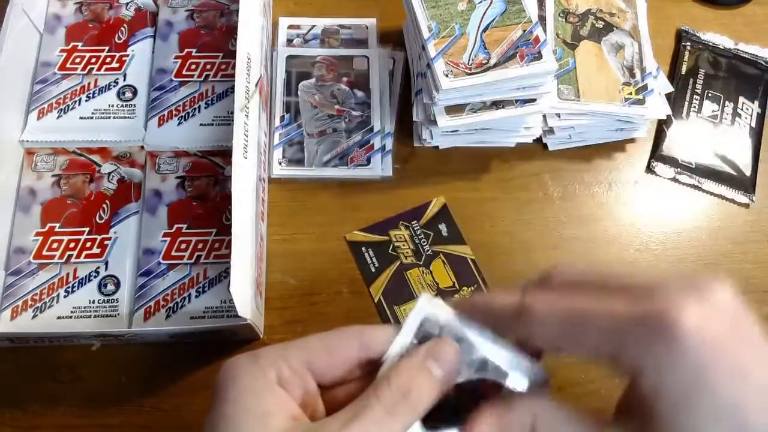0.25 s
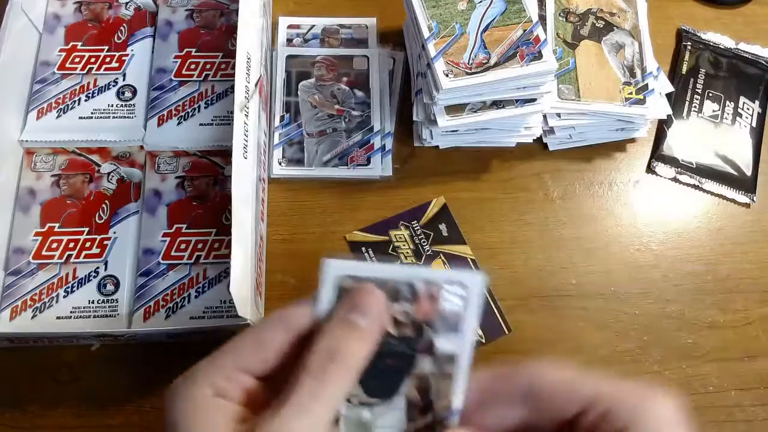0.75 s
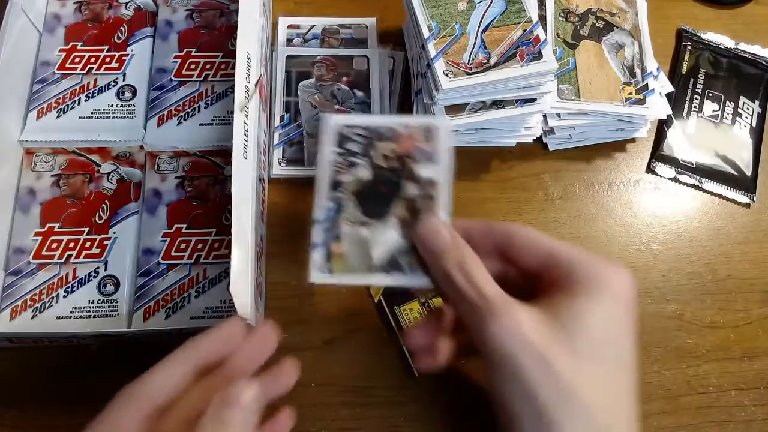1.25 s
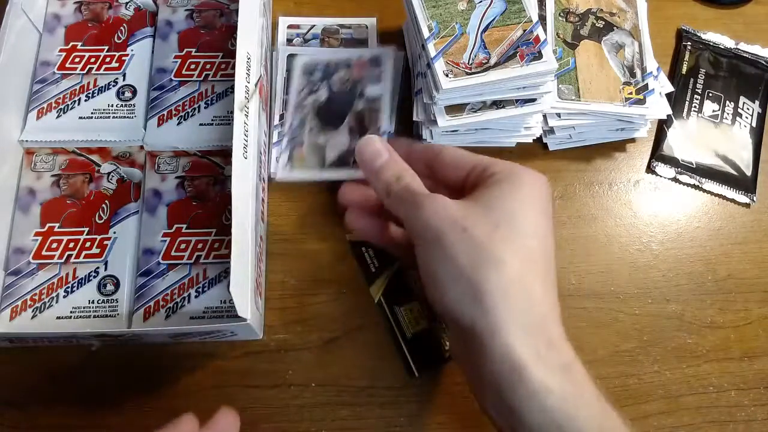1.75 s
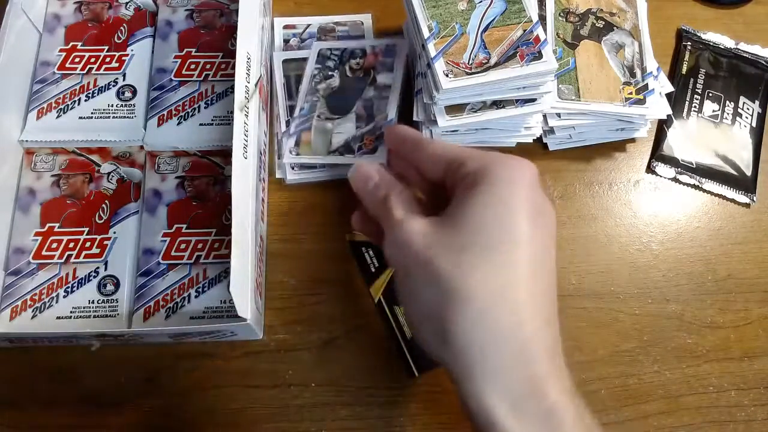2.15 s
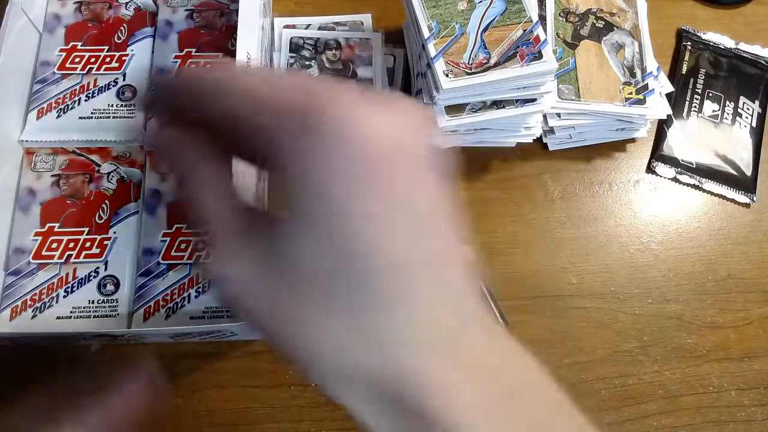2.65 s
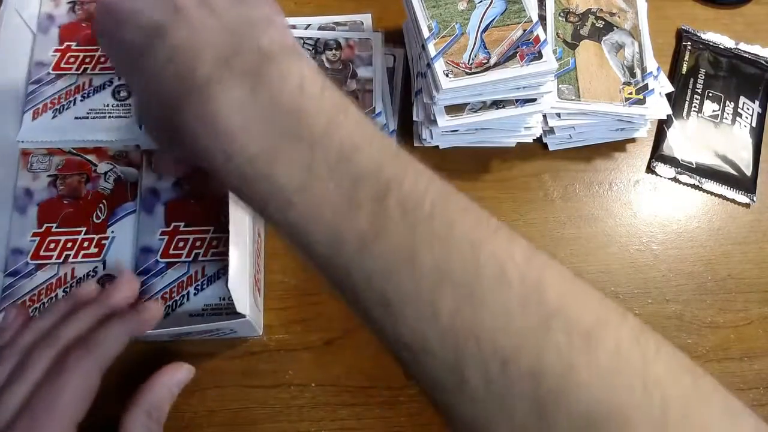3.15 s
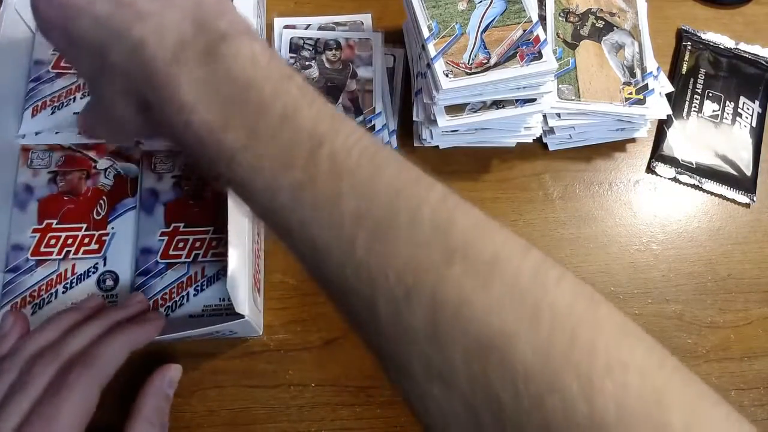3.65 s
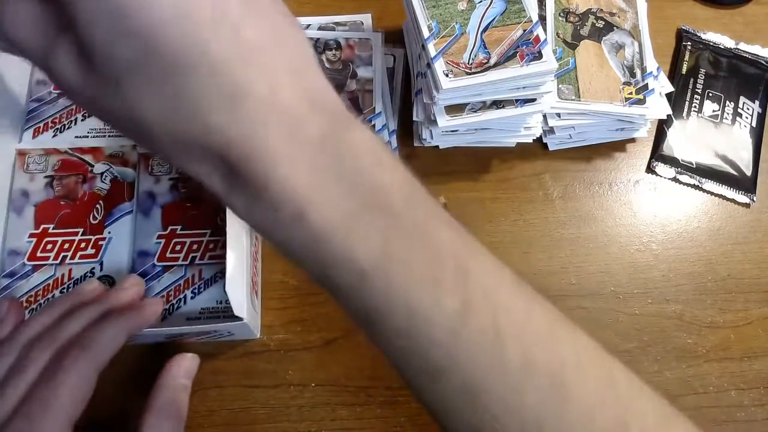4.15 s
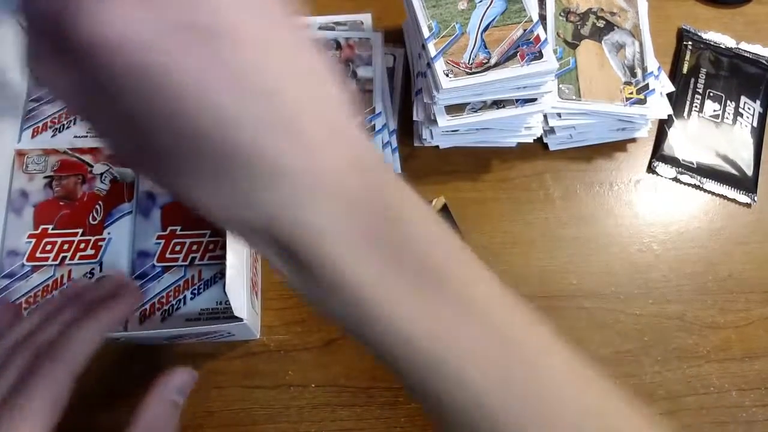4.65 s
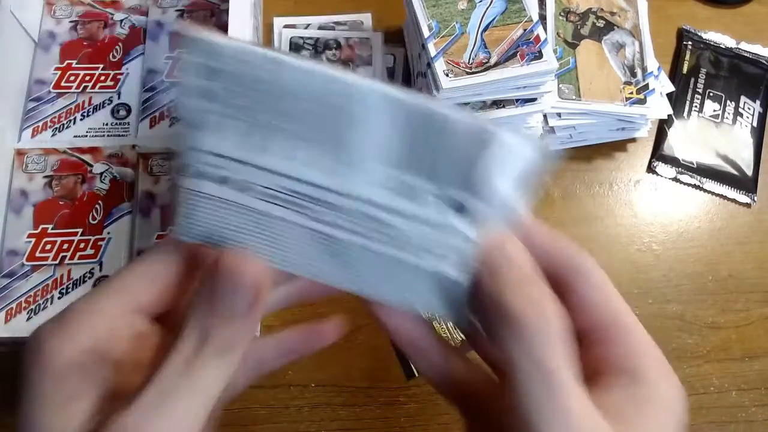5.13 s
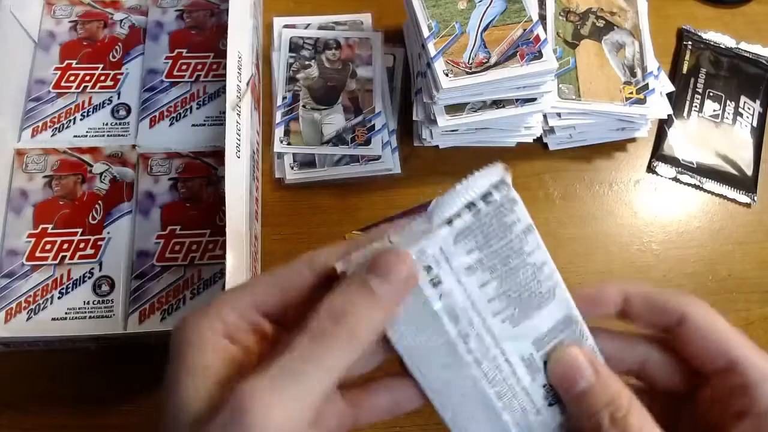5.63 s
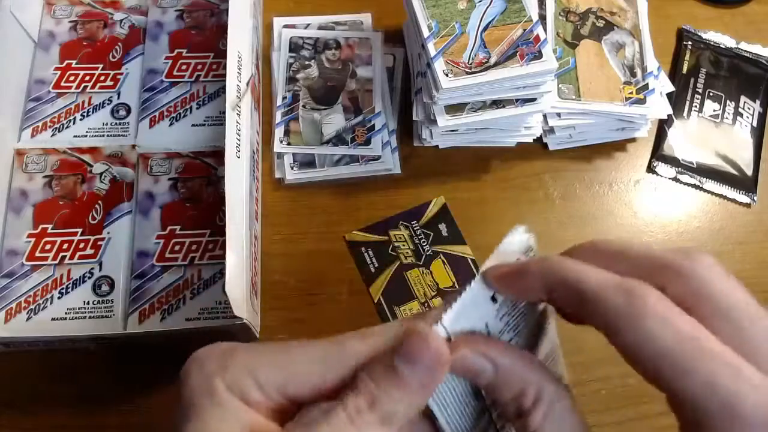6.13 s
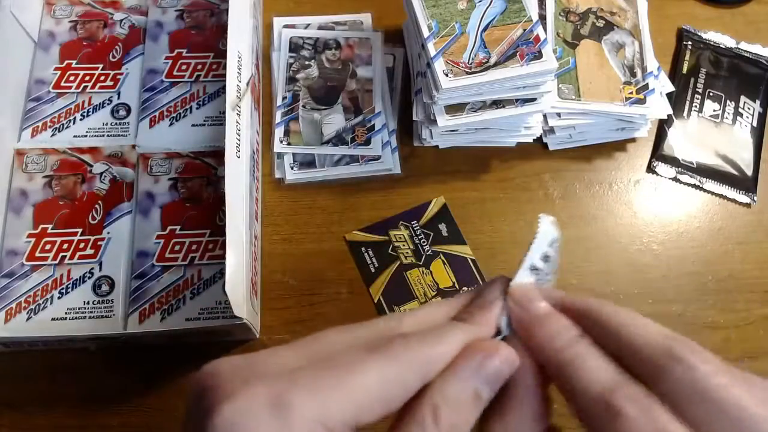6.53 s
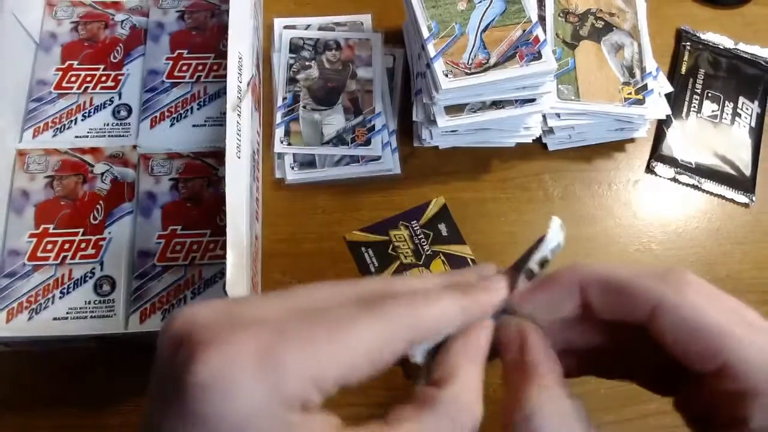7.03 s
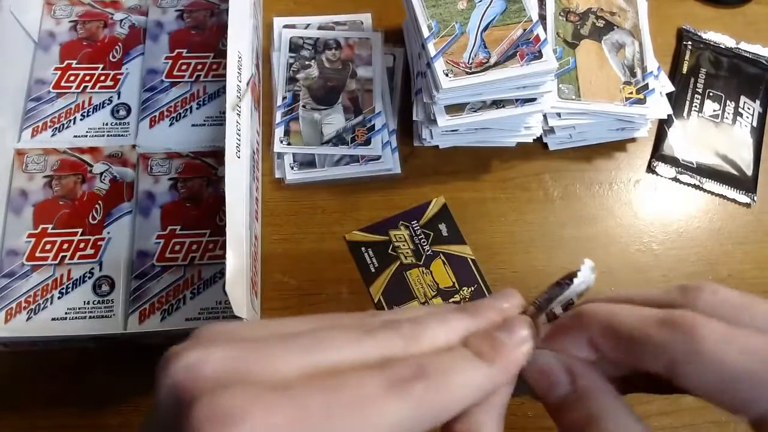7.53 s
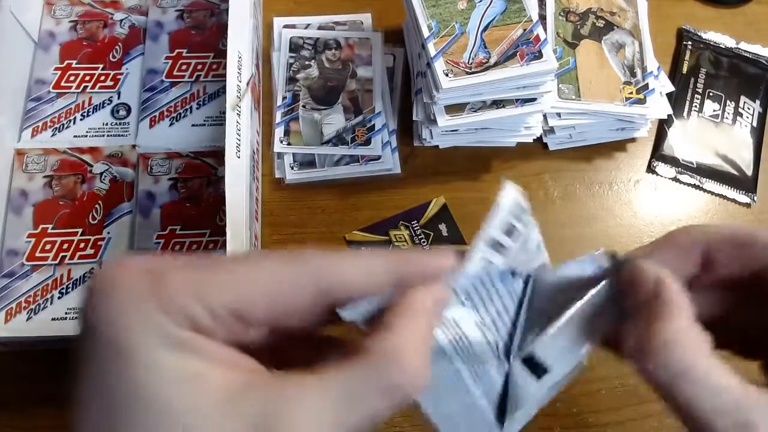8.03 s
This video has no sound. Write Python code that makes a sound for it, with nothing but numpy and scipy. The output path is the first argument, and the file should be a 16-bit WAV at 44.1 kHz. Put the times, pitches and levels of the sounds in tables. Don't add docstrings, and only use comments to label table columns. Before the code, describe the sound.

Close-up hands set down a card, rummage in a box, then turn, rip and peel a crinkly foil packet over faint fan noise.

```python
import sys
import numpy as np
from scipy import signal
from scipy.fft import rfft, irfft
from scipy.io import wavfile
from scipy.ndimage import uniform_filter1d

SR = 44100
rng = np.random.default_rng(int(sys.argv[2]) if len(sys.argv) > 2 else 0)


def amplitude_ratio(level_db):
    exponent = np.asarray(level_db, float) / 20
    return 10 ** exponent


def store_pcm(level_fs):
    pcm = np.round(np.clip(level_fs, -1, 1) * 32767).astype(np.int16)
    wavfile.write(sys.argv[1], SR, np.atleast_2d(pcm).T)


N = 365148


def evened(x):
    return x / np.sqrt(np.mean(x ** 2) + 1e-30)


def read(points, hz):
    f, value = np.transpose(points)
    return np.interp(np.log(hz + 1), np.log(f + 1), value)


def add(mix, s, sound):
    part = mix[round(s * SR):][:len(sound)]
    part += sound[:len(part)]


def coloured(x, gain):
    return irfft(rfft(x) * gain(np.fft.rfftfreq(len(x), 1 / SR)), len(x))


def band(x, lo_hz, hi_hz):
    sections = signal.butter(3, [lo_hz, hi_hz], "bandpass", fs=SR, output="sos")
    return signal.sosfilt(sections, x)


# [f/Hz, level/dB per Hz]
FOIL_RESPONSE = [(120, -5.5), (500, -15.5), (1300, 1), (2500, -8), (3300, -4), (4300, 3), (5900, -7),
                 (7400, -2), (9000, -8.5), (11500, -8.5), (14500, -8), (16800, -26.5)]


def foil(hz):
    return amplitude_ratio(read(FOIL_RESPONSE, hz))


def crackle(size, per_s, spread_db, smooth):
    happens = rng.random(size) < per_s / SR
    sizes_db = spread_db * np.minimum(rng.exponential(1, size), 3)
    slips = happens * amplitude_ratio(sizes_db) * rng.standard_normal(size)
    return evened(slips) + smooth * rng.standard_normal(size)


# [lowest f/Hz, highest f/Hz]
FOIL_BANDS = [(400, 2500), (2500, 6500), (6500, 10500), (10500, 16900)]
# [t/s, energy level/dB, low flex above it/dB, brightness/dB]
SLEEVE_SNAPS = [
    (.0298, -51.5, -4, 8),
    (.0867, -51, 15, -17),
    (.2978, -36, -4, -4),
    (.3257, -39, -19, 1.5),
    (.4443, -32, -3.5, -4),
    (.6118, -50, -5, -5),
    (.9103, -34, -6, 9.5),
    (2.0012, -45, 6, -8),
    (2.0501, -47, 0, -8),
]
BOX_SNAPS = [(3.0346, -36, 13, -17), (3.0465, -24.5, 1, -7), (3.0525, -27.5, 8.5, 3),
             (3.2071, -28.5, -0.5, -8), (3.423, -31, 7.5, -7), (3.452, -11.5, -4.5, -24),
             (3.491, -26, 4.5, -7), (3.5202, -19.5, -4.5, -10), (3.6306, -28.5, 0, -2),
             (3.653, -41, 11, -1), (3.679, -24, -5, -4.5), (3.797, -38.5, 12.5, 1), (3.82, -18.5, 0, -5.5),
             (3.836, -29, 10, -6), (3.856, -24.5, 1, -9), (3.873, -22.5, 2, -2), (3.903, -14.5, 7.5, 1.5),
             (3.9295, -14.5, -2, -7), (3.9596, -12, -5, -4), (4.062, -39.5, 14, -14),
             (4.1831, -27.5, -18, 4.5), (4.3236, -3.5, -13.5, -10.5), (4.4435, -29.5, -9, 2),
             (4.528, -30.5, 4, -3.5), (4.65, -45, 14, -7), (4.672, -33.5, 4.5, -18), (4.7018, -30, 8, -11),
             (4.7737, -17, -32, -3), (4.788, -30, -13, 0)]
TURN_SNAPS = [(4.9766, -33.5, -25, -3.5), (5.0508, -32, -21, -6.5), (5.1165, -25, -5, -11),
              (5.2015, -14.5, -16, -6), (5.2235, -14.5, -14, -11), (5.254, -4, -16, -14),
              (5.2587, -9, -26, -7), (5.2847, -9.5, -11.5, -5), (5.2946, -23, 1, -13),
              (5.3509, -15, -13, -7), (5.38, -28, -27, -4), (5.4094, -26, -9.5, -1.5), (5.46, -30, 1, -10),
              (5.4843, -16.5, -14, -7), (5.5992, -28, 1.5, -7), (5.6298, -26, -11, -2.5),
              (5.6332, -25.5, -3, -2), (5.682, -26, 3, -6), (5.8104, -25, -3, -1),
              (5.8308, -19, -11.5, -1.5), (5.8367, -21, -24, -9), (5.8692, -18.5, -13, 4.5),
              (5.886, -18.5, -10, 0), (6.037, -25.5, -0.5, -9), (6.11, -22, -11, 8.5),
              (6.1305, -8.5, -13, -8), (6.1511, -22.5, -9, 10), (6.2143, -18, -3.5, -3),
              (6.2502, -17, -32, -6), (6.269, -20.5, -5.5, -4)]
TEAR_SNAPS = [(6.4211, -26.5, -3.5, 10.5), (6.471, -28.5, -11, 6.5), (6.5339, -26, -1, -6),
              (6.5547, -11.5, -11, 1.5), (6.5723, -20, -20, -9), (6.5762, -29, 7.5, 13),
              (6.5795, -18, -6, -4), (6.6058, -15.5, -6.5, -5), (6.627, -28, -17, 6), (6.6379, -35, -20, 9),
              (6.6527, -19.5, 1.5, 13), (6.6848, -25, 6.5, 10), (6.7183, -12.5, -10, 5.5),
              (6.7249, -17.5, -11, 1), (6.8017, -16, -13, 2), (6.8302, -19.5, -9, -3),
              (6.8634, -23, -4, -12), (6.8695, -17.5, -23, -13), (6.913, -23.5, -15, 2),
              (6.9663, -14, -9.5, -10), (6.9794, -28, 1.5, -2), (7.02, -29, 2, -4), (7.068, -11, -8.5, -2),
              (7.0855, -18.5, -1.5, -20), (7.1326, -26.5, -6, 3), (7.1467, -18.5, -15, -2),
              (7.2083, -22.5, -5, -1.5), (7.2504, -13.5, -6, -8.5), (7.282, -18.5, -13, -5),
              (7.3315, -24.5, -1.5, -7)]
PEEL_SNAPS = [(7.3945, -7.5, -12, -8), (7.5068, -19, -4.5, -11), (7.5497, -35, -1, -2),
              (7.5874, -18.5, -2.5, 3.5), (7.6036, -12.5, -2.5, -7), (7.6215, -20, -5, 1),
              (7.6575, -22.5, -8, -3.5), (7.7033, -26, -23, 0.5), (7.7768, -28, -14, -3),
              (7.7962, -36.5, -13, 13), (7.8582, -49, -13, 19), (7.8787, -24.5, -15, -12),
              (7.9292, -31, -10, 12), (7.9375, -21.5, -3, -2), (7.9415, -14.5, -14, -1),
              (7.946, -4, -20, -4.5), (7.9548, -16, -2.5, 4), (7.9647, -9, -4, -12), (8.004, -23, 0, -3),
              (8.0694, -13, -4.5, -7.5), (8.185, -28.5, -5, -14), (8.1921, -28, 1.5, -8),
              (8.2765, -25.5, -6.5, -5.5)]
# [t/s, energy level/dB]
FAINT_TICKS = [(3.568, -30), (3.574, -30.5), (3.588, -34), (3.6008, -32), (4.148, -32), (4.4535, -30.5),
               (4.4935, -30), (4.69, -38), (4.7556, -35.5), (5.3928, -28), (5.468, -40), (5.549, -29),
               (6.0673, -29.5), (6.2908, -26.5), (6.5987, -25), (6.851, -35), (7.0047, -32), (7.0886, -27),
               (7.1742, -29), (7.183, -30), (7.272, -25), (7.634, -30), (7.6533, -29), (8.0365, -35),
               (.342, -49), (.437, -47), (.929, -46), (.997, -49), (3.272, -49), (3.305, -52), (3.387, -46),
               (3.535, -32), (3.719, -42), (3.734, -37), (4.224, -39), (4.5057, -35), (5.0375, -42),
               (5.089, -46), (5.184, -35), (5.5183, -34), (5.5597, -34), (5.7907, -41), (6.563, -30),
               (6.614, -32), (6.818, -28), (6.902, -34), (7.0565, -42), (7.192, -32), (7.215, -31),
               (7.727, -35), (7.818, -38), (7.915, -35), (7.973, -21), (8.051, -36), (8.078, -28),
               (8.256, -40)]
TICK_FLEX_DB, TICK_BRIGHT_DB = -5, -3.5
FIZZ_DB, FIZZ_SLOPE, SHEEN_DB, SHEEN_SLOPE = 1.5, 0.79, -3, 1.11
FACET_DB = 2


def snaps():
    ticks = [(s, db, TICK_FLEX_DB, TICK_BRIGHT_DB) for s, db in FAINT_TICKS]
    rows = SLEEVE_SNAPS + BOX_SNAPS + TURN_SNAPS + TEAR_SNAPS + PEEL_SNAPS + ticks
    out, t = np.zeros(N), np.arange(512) / SR
    starts, db, low_db, bright_db = np.transpose(rows)
    noise = rng.standard_normal((len(rows), 513))
    slow = np.exp(0.2 * noise[:, -1:] - 0.018 * (db[:, None] + 12))
    flip = 1.7 * (np.arange(512) == 20)
    peaks = amplitude_ratio(FACET_DB * evened(uniform_filter1d(noise[:, 256:], 9)))
    facet = peaks * foil(np.fft.rfftfreq(512, 1 / SR))
    fizz_db = FIZZ_DB + FIZZ_SLOPE * bright_db
    sheen_db = SHEEN_DB + SHEEN_SLOPE * bright_db
    gains_db = [low_db + 0.24, -.7, fizz_db, sheen_db]
    fades_s = (0.0025, 0.0008, 0.00075, 0.0008)
    sounds = np.zeros((len(rows), len(t)))
    for fade, edge, gain_db in zip(fades_s, FOIL_BANDS, gains_db):
        crumple = noise[:, :512] * t / (t + 0.0002) * np.exp(-t / fade / slow)
        burst = rfft(flip + crumple)
        flattened = burst / (abs(burst) + .3) ** .3
        part = band(irfft(facet * flattened), *edge)
        sounds += amplitude_ratio(db + gain_db)[:, None] * part / np.linalg.norm(part, axis=1, keepdims=True)
    for s, sound in zip(starts, sounds):
        add(out, s, sound)
    return out


# [t/s, peak level/dB, f/Hz]
FACET_PINGS = [(3.4516, -25, 4260), (3.5194, -25, 3760), (3.6785, -36, 7360), (4.1829, -28, 7550),
               (4.3231, -13, 4700), (4.7735, -22, 4330), (5.0504, -39, 4300), (5.2011, -23, 4310),
               (5.254, -14, 4280), (5.2574, -20, 4300), (5.2839, -17, 5710), (5.3502, -25, 5130),
               (5.3807, -27, 5040), (5.4086, -32, 6660), (5.4675, -30, 5060), (5.4839, -28, 4400),
               (5.6321, -32, 6700), (5.8102, -32, 6610), (5.8306, -21, 6600), (5.8364, -20, 6030),
               (5.8686, -13, 14000), (6.11, -21, 9600), (6.13, -16, 4770), (6.1509, -16, 12500),
               (6.2143, -25, 3240), (6.2497, -23, 7200), (6.4213, -22, 7200), (6.554, -16, 7660),
               (6.5755, -24, 5000), (6.6059, -22, 3760), (6.6523, -14, 7570), (6.7171, -10, 9840),
               (6.8014, -27, 5860), (6.8299, -26, 5430), (6.8693, -28, 4000), (6.9127, -21, 12700),
               (6.9661, -28, 4100), (7.0673, -13, 7010), (7.1322, -28, 11700), (7.1462, -29, 7030),
               (7.208, -29, 7110), (7.2499, -20, 5400), (7.2818, -28, 5680), (7.3941, -11, 4020),
               (7.5058, -22, 5450), (7.5872, -22, 4080), (7.6201, -24, 4030), (7.6565, -29, 8080),
               (7.7029, -27, 6990), (7.7962, -32, 12600), (7.8785, -34, 4620), (7.9144, -33, 11500),
               (7.9404, -17, 4380), (7.9453, -13, 4340), (8.0691, -24, 3900)]
PING_DB, PING_CYCLES, PING_LATE_S = -5.5, 14, .0008


def pings():
    out, t = np.zeros(N), np.arange(1024) / SR
    for s, db, hz in FACET_PINGS:
        fade = amplitude_ratio(db + PING_DB - 60 * t * hz / PING_CYCLES)
        tone = np.minimum(t * hz, 1) * np.sin(2 * np.pi * hz * t)
        add(out, s + PING_LATE_S, fade * tone)
    return out


# [t/s, rustle level/dB]
BOX_RUB = [(2.95, -85), (3.36, -83), (3.42, -72), (3.6, -64), (3.7, -70), (3.78, -65), (4.0, -74),
           (4.1, -79), (4.42, -76), (4.5, -70), (4.62, -82), (4.9, -99)]
PACK_RUB = [(5.0, -82), (5.18, -70), (5.42, -65.5), (5.68, -72), (5.74, -88), (5.81, -70), (5.92, -78),
            (6.0, -86), (6.08, -74), (6.35, -74), (6.62, -63), (6.88, -60), (7.01, -66), (7.045, -82),
            (7.2, -74), (7.42, -75), (7.86, -72), (8.28, -79)]
SCUFF_DB, SCUFF_SLOPE, CARDBOARD_DB, OUT_OF_BOX_S = -74, .45, 7, 4.1


def rustle(snapping):
    grains = [evened(band(crackle(N, 1600, 4.4, .4), *edge)) for edge in FOIL_BANDS]
    t, hold = np.arange(N) / SR, np.exp(-1 / (0.012 * SR))
    aftermath = np.zeros(N)
    for edge, grain in zip(FOIL_BANDS, grains):
        power = signal.lfilter([1 - hold], [1, -hold], band(snapping, *edge) ** 2)
        aftermath += np.sqrt(power) * grain
    return amplitude_ratio(5.0) * coloured(rubbing(t), foil) + amplitude_ratio(-15) * aftermath


def rubbing(t):
    grains = [band(crackle(N, 1600, 4.4, .4), *edge) for edge in FOIL_BANDS]
    fine_db = np.interp(t, *np.transpose(BOX_RUB + PACK_RUB), left=-200)
    scuff_db = SCUFF_DB + SCUFF_SLOPE * (fine_db + 70) + CARDBOARD_DB * (t < OUT_OF_BOX_S)
    return amplitude_ratio(fine_db) * evened(sum(grains[1:])) + amplitude_ratio(scuff_db) * evened(grains[0])


# [t/s, length/s, level/dB, centre f/Hz, width/octaves]
DRAGS_AND_RIPS = [(.06, 0.3, -71.5, 13000, 1.1), (1.919, 0.079, -61.5, 590, 1.05),
                  (3.025, 0.055, -63, 1480, 2), (3.874, 0.045, -37, 1160, 2.5),
                  (4.439, 0.098, -57, 2470, 4.1), (5.277, 0.024, -47, 490, 0.8),
                  (5.741, 0.02, -58.5, 248, 1.5), (6.096, 0.028, -72, 8000, 1.5),
                  (6.645, 0.05, -37.5, 9000, 2), (6.724, 0.05, -45, 9000, 1.7), (6.74, .07, -53, 12000, .3),
                  (3.92, .04, -44, 1400, .6), (7.187, 0.043, -55, 6000, 1.5),
                  (7.589, 0.048, -42, 3350, 1.3), (7.947, 0.14, -45.5, 1030, 2),
                  (3.384, .06, -61, 900, 1.05), (5.781, 0.034, -63, 7000, 1)]


def drags():
    out = np.zeros(N)
    for s, length, db, hz, octaves in DRAGS_AND_RIPS:
        u = np.arange(16384) / SR / length

        def colour(f):
            return foil(f) ** 0.43 * np.exp(-.5 * (np.log2(f / hz + 1e-9) / octaves) ** 2)

        grains = evened(coloured(crackle(16384, 3500, 3.4, .6), colour))
        add(out, s, amplitude_ratio(db) * grains * np.minimum(u / 0.19, 1) * np.exp(-u ** 3))
    return out


def slipping(length, start_hz, end_hz, jitter):
    u = np.minimum(np.arange(4096) / SR / length, 1)
    wobble = evened(uniform_filter1d(rng.standard_normal(4096), 60))
    rate_hz = start_hz * (end_hz / start_hz) ** u * (1 + jitter * wobble)
    return np.cumsum(rate_hz) / SR, np.sqrt(np.sin(np.pi * u).clip(0))


# [t/s, length/s, level/dB, start slips f/Hz, end slips f/Hz]
SEAM_CREAKS = [
    (6.752, .05, -46, 440, 440),
    (6.99, .028, -56.5, 210, 190),
    (7.188, .03, -52.5, 180, 196),
]
# [t/s, length/s, level/dB, start f/Hz, end f/Hz]
SEAM_SQUEAKS = [
    (6.637, .016, -42, 7400, 2500),
    (6.646, .016, -36, 7700, 7400),
    (6.654, .012, -41, 2600, 3400),
    (6.665, .012, -33, 7700, 7300),
    (6.667, .01, -41, 5200, 4500),
]
SLIP_JITTER, SLIP_S = .2, .00045
SQUEAK_JITTER, OVERTONE_DB = .06, -4


def creaks():
    out = np.zeros(N)
    for s, length, db, start_hz, end_hz in SEAM_CREAKS:
        turns, arch = slipping(length, start_hz, end_hz, SLIP_JITTER)
        puffs = np.exp(-(turns % 1) / start_hz / SLIP_S) * rng.standard_normal(len(turns))
        add(out, s, amplitude_ratio(db) * arch * evened(band(coloured(puffs, foil), 2500, 15000)))
    for s, length, db, start_hz, end_hz in SEAM_SQUEAKS:
        turns, arch = slipping(length, start_hz, end_hz, SQUEAK_JITTER)
        overtone = amplitude_ratio(OVERTONE_DB) * np.sin(2 * np.pi * 2 * turns)
        add(out, s, amplitude_ratio(db) * arch * (np.sin(2 * np.pi * turns) + overtone))
    return out


# [t/s, peak level/dB, f/Hz, t60/s]
PANEL_RINGS = [(3.208, -44, 804, 0.034), (3.877, -31, 1660, 0.13), (3.922, -34, 570, 0.07),
               (4.9, -48.5, 2080, 0.037), (4.557, -56, 580, 0.11), (4.67, -43, 620, .022),
               (4.703, -46, 523, 0.067), (5.2246, -28, 3020, 0.0093), (7.068, -32.5, 2090, 0.02),
               (4.146, -41.5, 576, 0.11), (4.145, -36, 197, .04), (4.148, -50, 1696, .06),
               (4.462, -48.5, 590, 0.044), (4.527, -51, 960, .04), (4.2, -50, 930, .06),
               (3.532, -46, 590, .04), (3.528, -44, 960, 0.033), (3.874, -9, 171, .015),
               (3.886, -35, 1650, .04), (7.3947, -17, 7570, .003), (5.286, -24, 4200, .006),
               (4.703, -48, 2200, .02), (3.53, -50, 280, .05), (3.871, -31, 510, 0.029),
               (3.902, -26.5, 1400, .015), (3.889, -33, 885, .03), (3.208, -45, 930, .03),
               (3.065, -50, 170, .05), (7.02, -46.5, 1500, .04), (6.653, -31.5, 1430, .01)]


def rings():
    out, t = np.zeros(N), np.arange(8192) / SR
    for s, db, hz, t60 in PANEL_RINGS:
        tones = np.sin(2 * np.pi * hz * t) + .5 * np.sin(2 * np.pi * 1.02 * hz * t)
        add(out, s, amplitude_ratio(db - 60 * t / t60) * np.minimum(t * hz / 0.78, 1) * tones)
    return out


# [t/s, desk peak level/dB, desk f/Hz, box above desk/dB, scuffle/s]
BOX_DESK_KNOCKS = [(.086, -53.5, 197, 4, 0.0069), (1.933, -55.5, 91.7, 6, 0.033),
                   (2.705, -59.5, 85, 8, 0.028), (2.985, -52.5, 74, -1, 0.022),
                   (3.058, -48.5, 68.4, 6, 0.044), (3.205, -44.5, 165, 0, 0.0073),
                   (3.536, -42, 87, 1, 0.006), (3.598, -46, 87.5, 5.5, 0.083), (3.87, -40, 185, 14, 0.04),
                   (3.92, -24.5, 89.6, 3.5, 0.011), (4.14, -39, 98.4, 3, 0.027),
                   (4.45, -47.5, 84, 10, 0.024), (4.471, -40.5, 91, -2, 0.053),
                   (4.556, -49.5, 69, 2, 0.019), (4.608, -49.5, 74, 0.5, 0.12),
                   (4.702, -50, 81.4, 9.5, 0.011), (3.65, -50.5, 95, -1, .02), (3.76, -52, 120, 0, .05),
                   (3.4, -54, 130, 0, .04), (4.78, -54, 84.6, -6, .03)]
# [f/Hz, level/dB, t60/s]
BOX_MODES = [(182, -1.5, 0.11), (243, 2.5, 0.036), (316, 2, 0.016), (581, -1.5, 0.068), (914, 1.5, 0.021),
             (1257, -5.5, 0.079), (1654, -6, 0.055), (2030, -42, .05)]
DESK_T60_S, DESK_DAMPING = 0.12, 2


def knocks():
    out, t = np.zeros(N), np.arange(16384) / SR
    oddities = rng.standard_normal((len(BOX_DESK_KNOCKS), len(BOX_MODES)))
    for (s, db, hz, box_db, scuffle), odd in zip(BOX_DESK_KNOCKS, oddities):
        t60 = DESK_T60_S * (100 / hz) ** DESK_DAMPING
        desk = np.sin(2 * np.pi * hz * t) * amplitude_ratio(-60 * t / t60) * (1 - np.exp(-t / 0.0052))
        modes = np.zeros(len(t))
        for (f, mode_db, ring), o in zip(BOX_MODES, odd):
            pitch_hz = f * (1 + .02 * o)
            modes += amplitude_ratio(mode_db + 2.5 * o - 60 * t / ring) * np.sin(2 * np.pi * pitch_hz * t)
        u = t / max(scuffle, .002)
        shove = crackle(len(t), 900, 0.6, 0.24) * np.exp(-u) * np.minimum(u / 0.18, 1)
        shaken = evened(signal.fftconvolve(shove, modes)[:len(t)])
        box = shaken + 0.56 * evened(band(shove, 353, 1780))
        add(out, s, amplitude_ratio(db + 9.0) * desk + amplitude_ratio(db + box_db) * box / abs(box).max())
    return out


# [t/s, level/dB]
NEAR_ECHOES = [
    (.0021, -24),
    (.0043, -29.5),
    (.0092, -18),
    (0.0178, -26),
]
# [f/Hz, t60/s]
ROOM_DECAY = [(500, 0.26), (1500, 0.15), (4000, 0.14), (9000, 0.09), (15000, 0.15)]


def room(x, tail_db=-10.5):
    size, out, t = SR // 2, x.copy(), np.arange(N) / SR
    for s, db in NEAR_ECHOES:
        add(out, s, amplitude_ratio(db) * band(x, 870, 11000))
    for turn in range(3):
        happens = (rng.random(size) < 5000 / SR) * (np.arange(size) > 120)
        taps = rng.choice([-1., 1.], size) * happens
        hz, when, z = signal.stft(taps, SR, nperseg=128)
        decay = amplitude_ratio(-60 * when / read(ROOM_DECAY, hz)[:, None])
        tail = signal.istft(z * decay, SR, nperseg=128)[1]
        share = np.sqrt(2 / 3) * np.cos(np.pi * (t / .09 + turn / 3))
        out += amplitude_ratio(tail_db) * signal.fftconvolve(x * share, tail / np.linalg.norm(tail))[:N]
    return out


def crests(rows, rise_db_s, fall_db_s):
    t = np.arange(0, N, 64) / SR
    s, hold, db = np.transpose(rows)[:, :, None]
    level_db = db - rise_db_s * np.maximum(s - t, 0) - fall_db_s * np.maximum(t - s - hold, 0)
    return np.interp(np.arange(N) / SR, t, amplitude_ratio(level_db.max(axis=0)))


# [t/s, hold/s, level/dB]
ARM_LEANS = [
    (1.95, .2, -62.5),
    (3.08, 0.99, -46),
    (4.7, 0.59, -50),
]
LEAN_RISE_DB_S, LEAN_FALL_DB_S, STILL_DB = 101, 18.5, -74
# [t/s, level/dB]
HUM_SWELLS = [(.27, -65), (.83, -65.5), (1.7, -60.5), (2.35, -64), (3.5, -58.5), (4.2, -52), (5.65, -61.5),
              (6.52, -66), (7.56, -63), (8.28, -67)]
SWELL_RISE_DB_S, SWELL_FALL_DB_S = 16, 75


def sway():
    t = np.arange(N) / SR
    rocking = coloured(rng.standard_normal(N), lambda f: np.exp(-.5 * (np.log2(f / 18.5 + 1e-9) / .24) ** 2))
    weight = amplitude_ratio(STILL_DB) + crests(ARM_LEANS, LEAN_RISE_DB_S, LEAN_FALL_DB_S)
    rumble = amplitude_ratio(-75.5) * evened(band(rng.standard_normal(N), 17, 68))
    hum = np.sqrt(2) * np.sin(2 * np.pi * 59.5 * t)
    throb = crests([(s, 0, db) for s, db in HUM_SWELLS], SWELL_RISE_DB_S, SWELL_FALL_DB_S)
    return weight * evened(rocking) + throb * hum + rumble


# [f/Hz, level/dB per Hz]
FAN_AIR = [(40, -30.5), (80, -9.5), (206, -20.5), (443, -21), (800, -24), (1000, -25.5), (2100, -22),
           (2700, -29.5), (3600, -35.5), (4500, -35.5), (5700, -39.5), (6800, -40.5), (9000, -44.5),
           (16000, -45)]
FAN_DB = -62
# [f/Hz, level/dB]
MOTOR_LINES = [(975, -80), (1292, -84), (13948, -102), (14524, -94)]
# [f/Hz, width/Hz, level/dB]
HOUSING = [(1186, 114, -74.5), (1746, 83, -77.5), (2056, 110, -76)]


def fan():
    air = coloured(rng.standard_normal(N), lambda f: amplitude_ratio(read(FAN_AIR, f)))
    out = amplitude_ratio(FAN_DB - 3.5) * evened(air)
    for hz, db in MOTOR_LINES:
        drift_hz = 1.55 * evened(uniform_filter1d(rng.standard_normal(N), 4000))
        out += amplitude_ratio(db) * np.sqrt(2) * np.sin(2 * np.pi * np.cumsum(hz + drift_hz) / SR)
    for hz, width, db in HOUSING:
        resonance = coloured(rng.standard_normal(N), lambda f: np.exp(-.5 * ((f - hz) / width) ** 2))
        out += amplitude_ratio(db) * evened(resonance)
    return out


def scene():
    snapping = snaps() + pings()
    handling = snapping + drags() + rings() + rustle(snapping) + creaks()
    return (room(handling) + knocks() + sway() + fan())[None]


def band_limit(x):
    return signal.sosfilt(signal.butter(12, 17010, fs=SR, output="sos"), x)


EDGE_HZ, TOP_HZ = 15780, 16900


def record(dry):
    low = coloured(dry[0], lambda f: f < EDGE_HZ)
    top = coloured(dry[0], lambda f: (f >= EDGE_HZ) * (f < TOP_HZ))
    leap = uniform_filter1d(top ** 2, 128) > 5 * uniform_filter1d(top ** 2, 1500)
    kept = amplitude_ratio(4) * top * uniform_filter1d(leap * 1., 200)
    return band_limit((low + kept)[None])


dry = scene()
out = record(dry)
store_pcm(out)
```